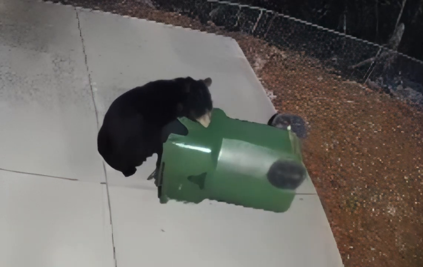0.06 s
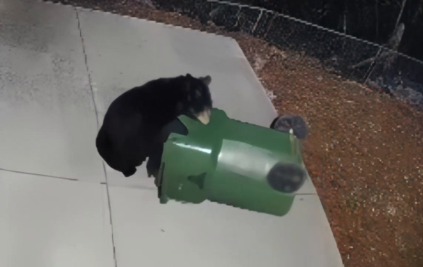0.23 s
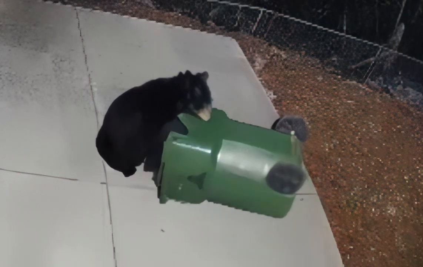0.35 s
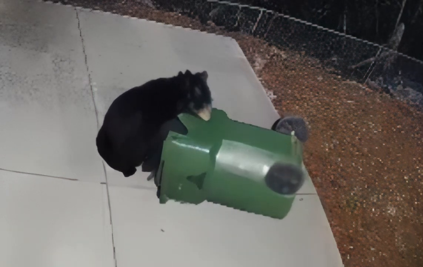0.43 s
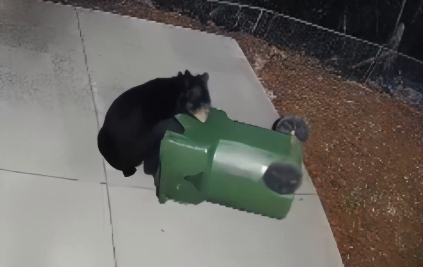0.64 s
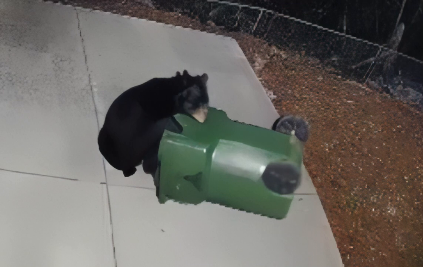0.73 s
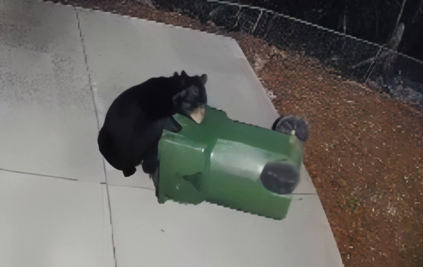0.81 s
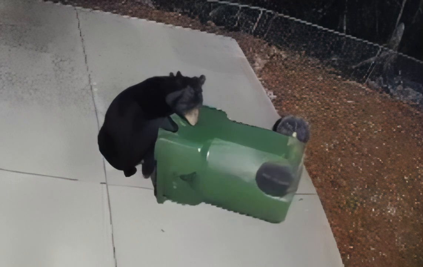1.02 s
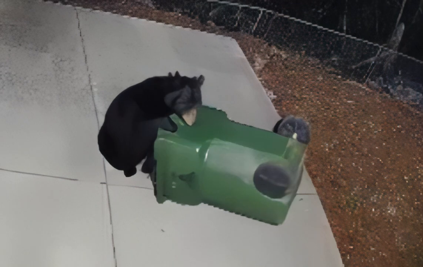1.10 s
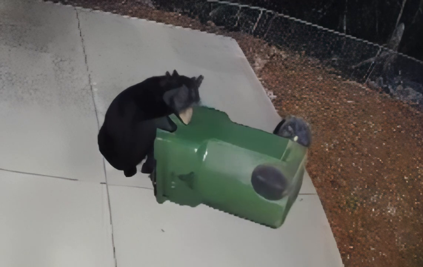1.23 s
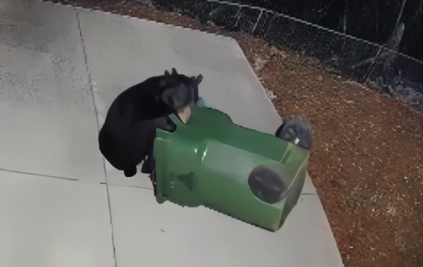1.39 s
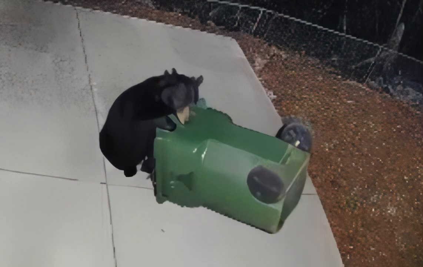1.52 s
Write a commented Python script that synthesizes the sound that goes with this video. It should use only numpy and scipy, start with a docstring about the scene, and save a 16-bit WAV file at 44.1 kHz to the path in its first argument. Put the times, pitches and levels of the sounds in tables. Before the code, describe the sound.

Hard gritty scrape and knocks of a big plastic trash bin on a driveway, then a thud.

```python
"""Night hush, then a bear shoves a plastic wheelie bin lying on a concrete drive: filtered noise, then grit.
The rim grinds in one hard drag, as showers of tiny impacts sent through the resonances of the walls.
Claws and lid tick and clatter as ringing sines and short grit bursts, amid low rumble and brief rasps.
Then the bin tips over an edge, its hollow body booms as decaying sines, and it scrapes to rest.
A small outdoor camera hears it with a faint tail from the yard, little bass and no top treble."""
import sys
import numpy as np
from scipy import signal
from scipy.fft import rfft, irfft
from scipy.io import wavfile

SR = 44100
rng = np.random.default_rng(int(sys.argv[2]) if len(sys.argv) > 2 else 0)


def unload_audio(sound):
    """Save the sound as a 16-bit wav file, at the path given as the first command line argument."""
    columns = np.transpose(np.atleast_2d(sound))
    # keep every value between -1 and 1, then stretch to whole-number steps
    steps = np.round(np.clip(columns, -1, 1) * 32767)
    wavfile.write(sys.argv[1], SR, steps.astype(np.int16))


N = 68355
T = np.arange(N) / SR  # seconds
HZ = np.arange(N + 1) * SR / (2 * N) + 1e-6  # filter frequencies, kept just above zero

# colour of the night air: pitch_hz, relative_level_db
NIGHT_COLOUR = [(18, -28.5), (30, -10), (92, 1), (496, -18), (1180, -11), (1450, -15.5), (3610, -15),
                (6540, -16.5), (7000, -18), (9100, -20), (15400, -120)]
# level curves of the rim dragging on concrete: time_s, bass_db, middle_db, treble_db
DRAG_LEVELS = [(0, -77, -84, -110), (.06, -92.5, -73, -68), (0.105, -68, -59.5, -62.5),
               (0.111, -69, -52.5, -50), (.195, -55.5, -42.5, -33), (0.224, -37.5, -18.5, -16),
               (0.256, -33, -22, -18), (0.29, -36.5, -16, -18), (0.302, -42, -27, -22),
               (.335, -63, -34, -36.5), (.41, -35.5, -31, -28), (.466, -41, -39, -39.5),
               (.515, -46, -32.5, -33.5), (0.554, -38, -32, -33), (0.597, -57.5, -59, -58),
               (.72, -58.5, -63.5, -53), (.87, -52.5, -43.5, -46.5), (0.941, -55, -57, -53.5),
               (1, -83.5, -66.5, -68), (1.05, -71, -65, -60), (1.084, -46.5, -45, -43.5),
               (1.107, -39, -39.5, -36.5), (1.158, -21.5, -24.5, -33), (1.202, -32, -46.5, -42.5),
               (1.216, -41, -40.5, -37.5), (1.256, -42, -45, -42.5), (1.294, -36, -46.5, -46.5),
               (1.315, -42.5, -48, -48.5), (1.38, -63.5, -56, -59), (1.439, -82, -67, -73),
               (1.55, -58.5, -60, -61)]
# borders of the three drag bands: edge_hz
DRAG_BAND_EDGES = [70, 720, 2100, 7200]
# resonances of the plastic walls: pitch_hz, width_hz, relative_level_db
WALL_RESONANCES = [(372, 26, -3.5), (429, 22, 6), (893.3, 35, 6.5), (1115, 51, 1), (1285, 44, 8),
                   (1418, 49, 2.5), (1530, 15, -2), (1639, 13, -0.5), (1725, 12, 4), (1878, 30, 3.5),
                   (2472, 56, 6.5), (2764, 70, 9.5), (3168, 97, 8), (3630, 26, 11), (4650, 34, 5),
                   (4910, 20, 8), (5486, 52, 4.5), (5920, 52, 4.5), (5670, 55, 10), (6144, 32, 9),
                   (6490, 50, 6.5)]
# smooth dips in the walls' sound: pitch_hz, half_width_hz, depth_db
WALL_HOLLOWS = [(563, 470, -1.5), (2090, 55, -8.5)]
# knocks and scuffs on the shell: start_s, rise_s, decay_s, bass_db, middle_db, upper_middle_db, treble_db
SHELL_KNOCKS = [(.061, .004, 0.014, -69, -49.5, -49, -49.5), (.2, 0.0006, 0.0061, -34.5, -23, -17, -30),
                (.209, 0.0035, 0.01, -32, -22, -20, -18), (0.247, 0.00095, 0.0073, -37.5, -18, -18, -24),
                (0.266, 0.00082, 0.0052, -29.5, -24, -17, -26.5),
                (0.307, 0.0013, 0.0024, -38, -20.5, -9, -14),
                (0.322, 0.00074, 0.0021, -43.5, -29, -14.5, -23.5),
                (.429, 0.0013, 0.0016, -28, -23.5, -12.5, -19),
                (0.443, 0.0034, 0.0057, -31, -28.5, -24, -33.5),
                (.529, 0.0016, 0.011, -51, -22, -44, -43.5), (.65, .011, 0.0034, -53, -36.5, -40.5, -41.5),
                (.668, .0025, 0.013, -41, -27, -33, -36.5), (0.687, 0.0037, 0.0085, -40, -30, -37, -49.5),
                (0.746, 0.0061, 0.011, -43, -29.5, -36.5, -44.5),
                (0.801, 0.0013, 0.0034, -51.5, -62, -40, -42),
                (0.831, 0.00074, 0.018, -59, -43.5, -34.5, -42),
                (0.879, 0.0024, 0.0078, -55.5, -44, -33.5, -34),
                (0.886, 0.0011, 0.016, -31, -44, -43.5, -44.5),
                (1.112, 0.0042, 0.0067, -35.5, -21.5, -35, -36),
                (1.14, 0.0061, 0.03, -22.5, -22.5, -29, -46),
                (1.253, 0.003, 0.016, -52, -34.5, -40.5, -40.5),
                (1.278, 0.0054, 0.0081, -50, -31, -31.5, -35),
                (1.488, 0.0021, 0.015, -54.5, -47.5, -55.5, -67)]
# borders of the four knock bands: edge_hz
KNOCK_BAND_EDGES = [110, 720, 2100, 4900, 7200]
# the hollow body humming as it slides and rocks: middle_s, half_length_s, level_db
BODY_RUMBLES = [(0.118, 0.031, -47.5), (0.225, 0.028, -32), (0.389, 0.03, -37.5), (0.467, .018, -39),
                (0.553, 0.031, -58), (0.693, 0.043, -50), (1.08, 0.014, -57), (1.179, .015, -32),
                (1.292, .045, -38), (1.497, 0.024, -44.5)]
# ringing air and big panels of the bin: pitch_hz, relative_level_db, t60_s
BODY_MODES = [(44, -27, .15), (75, 1, 0.23), (90.9, -8.5, .15), (135, -6.5, .12), (165.5, -2.5, 0.15),
              (200.2, -8, .2), (279, -9, 0.26), (353, -13, 0.14), (445, -20, 0.39), (477, -16, 0.11),
              (590, -20, .2)]
# claws and hard edges, one short ring each: start_s, pitch_hz, peak_db, decay_s
CLAW_TICKS = [(.2005, 5370, -7.5, .0018), (0.209, 5780, -13, .002), (.282, 361, -18, 0.0056),
              (0.28, 177, -24, 0.0059), (.306, 3608, -9.5, 0.0021), (.306, 1153, -11, 0.0019),
              (.323, 1748, -12, .0025), (0.4293, 5995, -8.5, 0.0013), (0.428, 4800, -22.5, 0.0012),
              (0.4306, 3153, -13, 0.0014), (0.4696, 5800, -24.5, 0.0014), (0.5082, 5800, -27, 0.0018),
              (0.5283, 5800, -14.5, 0.0012), (0.527, 2940, -20.5, 0.0051), (.66, 3040, -26.5, 0.0011),
              (.748, 5900, -35.5, .002), (.806, 4480, -37.5, .002), (.829, 4610, -23.5, .0015),
              (0.83, 2946, -25, 0.0022), (0.878, 5950, -30.5, .002), (0.8829, 1366, -20.5, 0.0032),
              (.834, 3517, -38.5, 0.029), (1.115, 889, -19.5, 0.0035)]
# blows that set the hollow bin booming: start_s, level_db, contact_s
BODY_BLOWS = [(0.216, -31.5, 0.01), (0.891, -41, 0.0053), (1.119, -18.5, 0.0061), (1.1445, -23.5, 0.004),
              (1.158, -11, 0.0024), (1.19, -17.5, 0.0025), (1.49, -36, 0.0047)]
# rubbing plastic around one resonance: middle_s, half_length_s, pitch_hz, width_hz, level_db
PLASTIC_RASPS = [(.274, 0.014, 1330, 300, -22), (.344, 0.0066, 1900, 360, -32.5),
                 (.545, 0.018, 1010, 250, -37), (0.67, 0.018, 3000, 700, -35.5),
                 (0.76, .012, 1900, 140, -48.5), (0.76, .014, 2950, 300, -39.5),
                 (.84, .012, 3800, 1700, -32), (.897, .016, 710, 260, -37.5), (.892, .01, 1155, 170, -32.5),
                 (.29, 0.0082, 350, 60, -28.5), (1.162, 0.03, 424, 110, -24),
                 (1.255, 0.025, 2470, 477, -32.5), (1.199, 0.014, 1740, 260, -36),
                 (1.333, 0.0077, 2400, 400, -43.5)]
# dips once the tipped bin turns another face to the camera: pitch_hz, half_width_hz, depth_db
TURNED_HOLLOWS = [(702.2, 143, -10), (1941, 82, -16.5), (4290, 95, -21), (6390, 110, -9.5),
                  (7040, 530, -22)]

NIGHT_DB = -66.5
GRIT_PER_S, GRIT_SPREAD_DB = 4000, 4.5  # impacts per second, scale of their random sizes
JUDDER_HZ, JUDDER_DB = 140, 1  # speed and spread of the drag's unsteadiness
SHELL_DIRECT_DB = 3  # unresonant sound straight through the walls
TICK_FLUTTER_HZ, TICK_FLUTTER_RAD = 300, 0.71
SETTLES_S, SETTLE_FADE_S, SETTLE_DB = 1.208, 0.0092, -7.5  # lying on the ground muffles the boom
TIPS_S, TURN_S = 1.06, 0.014
SIDE_DB, SIDE_T60_S = -37, .03  # faint short noise tail following the bin, opposite in left and right
YARD_DB, YARD_T60_S, YARD_DELAY_S = -21.5, .42, 0.021
LOW_CUT_HZ, TOP_HZ = 58, 7000
CEILING = .62  # amplitude the rounded peaks approach


def undb(db):
    """Turn decibels into an amplitude factor."""
    return 10 ** (np.asarray(db) / 20)


def unit(x):
    """Scale to an RMS of 1."""
    return x / np.sqrt(np.mean(x ** 2))


def shape(x, response):
    """Filter by a frequency response given on HZ."""
    return irfft(rfft(x, 2 * N) * response)[:N]


def ring(x, impulse):
    """Let x excite an impulse response."""
    return shape(x, rfft(impulse, 2 * N))


def wander(hz):
    """Smooth random drift with spread 1: noise with its fast changes removed."""
    return unit(shape(rng.standard_normal(N), 1 / (1 + (HZ / hz) ** 4)))


def swell(middle, half, db):
    """A bell-shaped rise and fall."""
    return undb(db) * np.exp(-((T - middle) / half) ** 2)


def hollow(rows):
    """A frequency response with smooth dips."""
    return undb(sum(depth * np.exp(-((HZ - hz) / width) ** 2) for hz, width, depth in rows))


def resonance(hz, width):
    """Frequency response of one resonance, 1 at its peak."""
    return 1 / (1 + 1j * (HZ / hz - hz / HZ) * hz / width)


def night():
    """Faint steady outdoor hush: noise coloured along a level curve."""
    hz, db = np.array(NIGHT_COLOUR).T
    colour = undb(np.interp(np.log(HZ), np.log(hz), db))
    return undb(NIGHT_DB) * unit(shape(rng.standard_normal(N), colour))


def grit():
    """Dense tiny impacts of very unequal size and random direction."""
    hit = rng.random(N) < GRIT_PER_S / SR
    direction = rng.choice([-1, 1], N)
    size = undb(GRIT_SPREAD_DB * np.minimum(rng.exponential(size=N), 2))
    return unit(hit * direction * size)


def shell(x, low, high):
    """One band of the plastic walls' resonant response, at unit power gain."""
    walls = undb(SHELL_DIRECT_DB) + sum(undb(db) * resonance(hz, width) for hz, width, db in WALL_RESONANCES)
    band_filter = signal.butter(N=4, Wn=[low, high], btype="band", fs=SR, output="sos")
    band = signal.sosfreqz(band_filter, HZ, fs=SR)[1]
    response = walls * band * hollow(WALL_HOLLOWS)
    return shape(x, response / np.sqrt(np.mean(abs(response) ** 2)))


def drag():
    """The rim sticks and slips over the grit and shakes the walls."""
    times, *band_levels = np.array(DRAG_LEVELS).T
    judder = unit(undb(JUDDER_DB * wander(JUDDER_HZ)))
    out = 0
    for db, low, high in zip(band_levels, DRAG_BAND_EDGES, DRAG_BAND_EDGES[1:]):
        force = grit() * judder * undb(np.interp(T, times, db))
        out = out + shell(force, low, high)
    return out


def knocks():
    """Short crunching contacts; the spot that is hit sets the balance of the bands."""
    band_forces = 0
    for start, rise, decay, *band_dbs in SHELL_KNOCKS:
        age = T - start
        envelope = np.clip(age / rise, 0, 1) * np.exp(-np.maximum(age - rise, 0) / decay)
        band_forces = band_forces + np.outer(undb(band_dbs), envelope)
    bands = zip(band_forces, KNOCK_BAND_EDGES, KNOCK_BAND_EDGES[1:])
    return sum(shell(force * grit(), low, high) for force, low, high in bands)


def body():
    """Impulse response of the hollow bin: decaying sines of its air and big panels."""
    return sum(undb(db - 60 * T / t60) * np.sin(2 * np.pi * hz * T) for hz, db, t60 in BODY_MODES)


def rumble():
    """Uneven sliding keeps the hollow body humming."""
    hum = unit(ring(grit(), body()))
    return hum * sum(swell(*row) for row in BODY_RUMBLES)


def ticks():
    """Hard little contacts swell and ring for a few milliseconds with a fluttering phase."""
    out, flutter = 0, wander(TICK_FLUTTER_HZ)
    for start, hz, db, decay in CLAW_TICKS:
        age = np.maximum(T - start, 0)
        envelope = age / decay * np.exp(1 - age / decay)  # peaks at 1
        phase = 2 * np.pi * hz * age + TICK_FLUTTER_RAD * flutter
        out = out + undb(db) * envelope * np.sin(phase)
    return out


def thumps():
    """Soft pushes ring the hollow body; longer contact sounds deeper, and the ground muffles it at rest."""
    force = 0
    for start, db, contact in BODY_BLOWS:
        push = np.sin(np.pi * np.clip((T - start) / contact, 0, 1)) ** 2
        force = force + undb(db) * push / push.sum()
    settled = np.clip((T - SETTLES_S) / SETTLE_FADE_S, 0, 1)
    return ring(force, body()) * undb(SETTLE_DB * settled)


def rasps():
    """Friction locks briefly on to one resonance of a wall."""
    out = 0
    for middle, half, hz, width, db in PLASTIC_RASPS:
        rasp = unit(shape(grit(), resonance(hz, width) ** 2))
        out = out + swell(middle, half, db) * rasp
    return out


def tipping(x):
    """The colour crossfades to a more hollowed one as the bin turns over."""
    turned = np.clip((T - TIPS_S) / TURN_S, 0, 1)
    return (1 - turned) * x + turned * shape(x, hollow(TURNED_HOLLOWS))


def diffuse_tail(x, t60, delay):
    """Smear x into a diffuse tail: decaying noise, silent until the delay, with unit energy."""
    tail = rng.standard_normal(N) * undb(-60 * T / t60) * (T > delay)
    return ring(x, tail / np.sqrt(np.sum(tail ** 2)))


def scene():
    """Sum the bin's sounds, add yard and night, and add a faint left-right difference."""
    bin_sound = tipping(drag() + knocks() + rumble() + ticks() + thumps() + rasps())
    side = undb(SIDE_DB) * diffuse_tail(bin_sound, SIDE_T60_S, 0)
    # house wall, fence and trees return the sound
    yard = undb(YARD_DB) * diffuse_tail(bin_sound, YARD_T60_S, YARD_DELAY_S)
    return night() + bin_sound + yard + np.array([side, -side])


def record(dry):
    """The camera drops the lowest bass, rounds the loudest peaks and cuts the top."""
    low_cut = signal.butter(2, LOW_CUT_HZ, "high", fs=SR, output="sos")
    thin = signal.sosfilt(low_cut, dry)
    rounded = CEILING * np.tanh(thin / CEILING)
    top_cut = signal.ellip(10, .3, 75, TOP_HZ, fs=SR, output="sos")  # ripple dB, rejection dB
    return signal.sosfilt(top_cut, rounded)


dry = scene()
out = record(dry)
unload_audio(out)
```